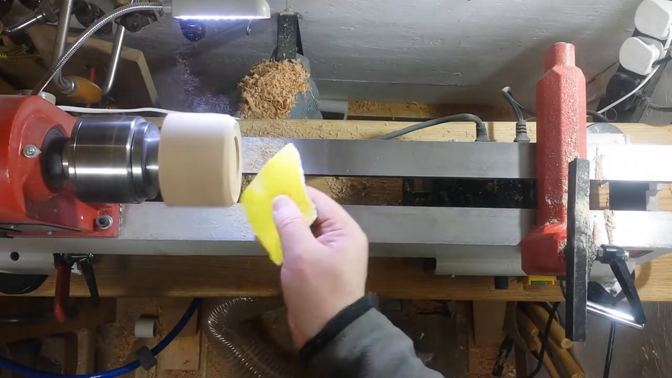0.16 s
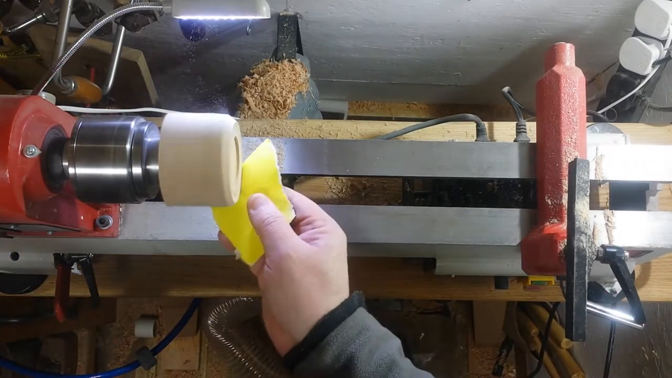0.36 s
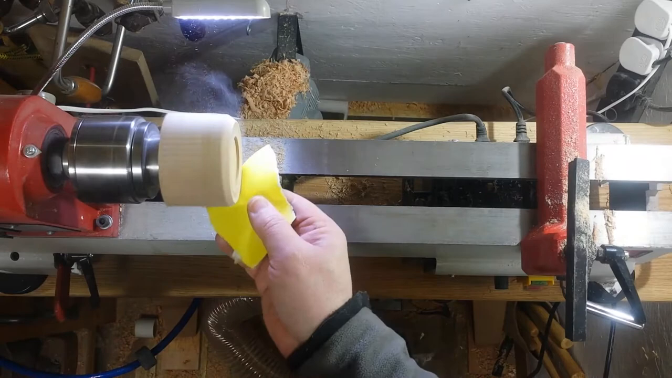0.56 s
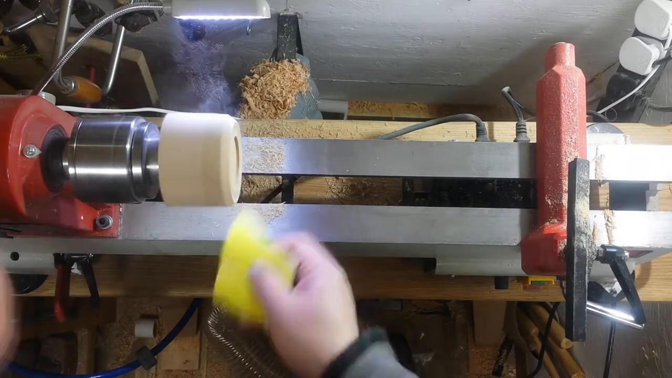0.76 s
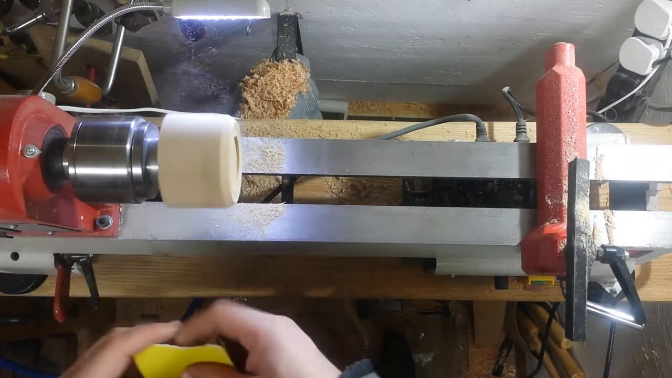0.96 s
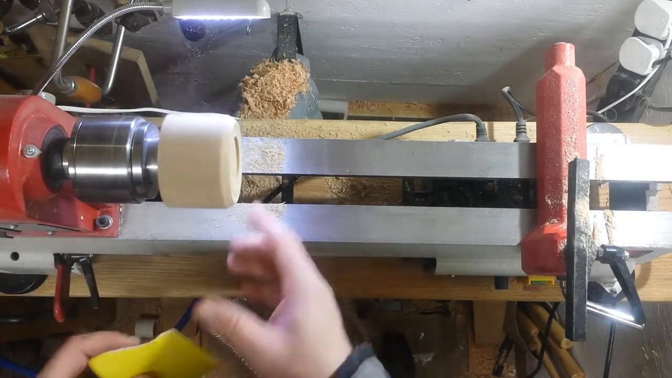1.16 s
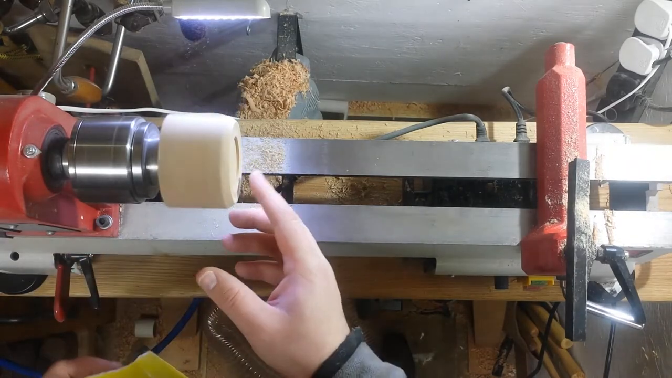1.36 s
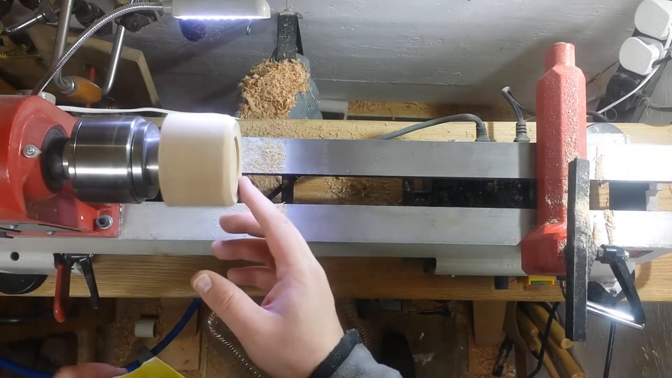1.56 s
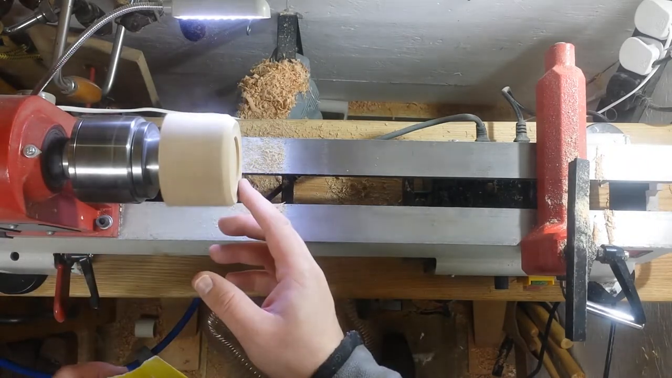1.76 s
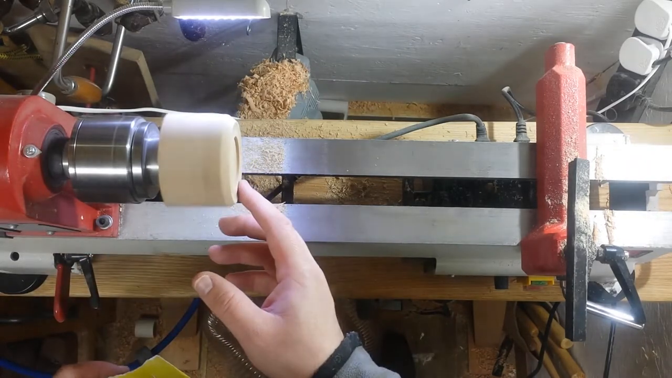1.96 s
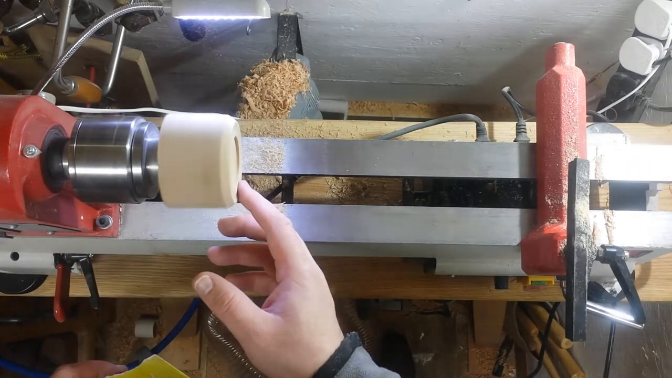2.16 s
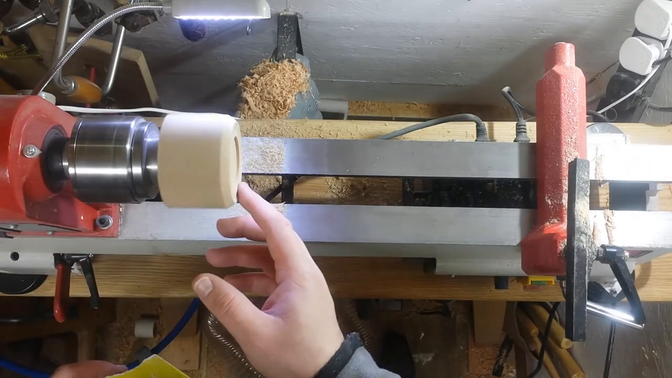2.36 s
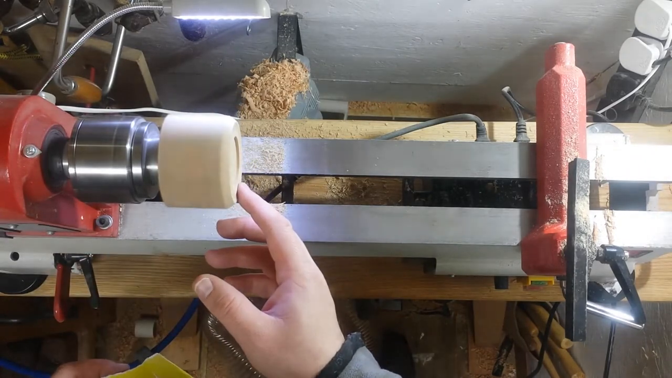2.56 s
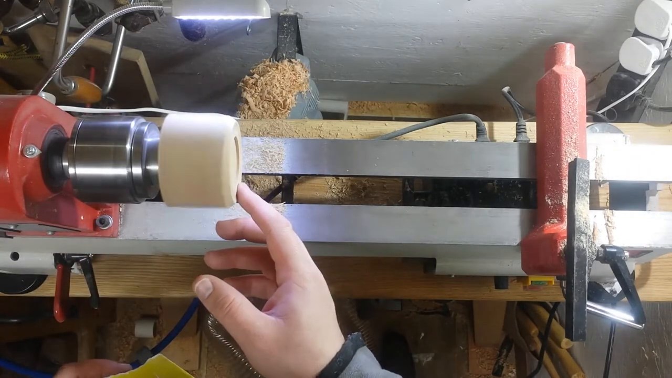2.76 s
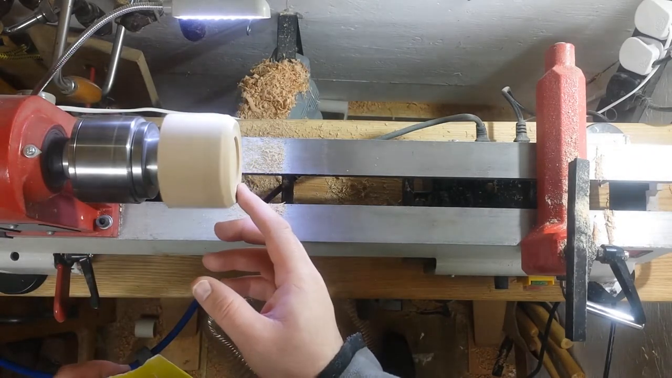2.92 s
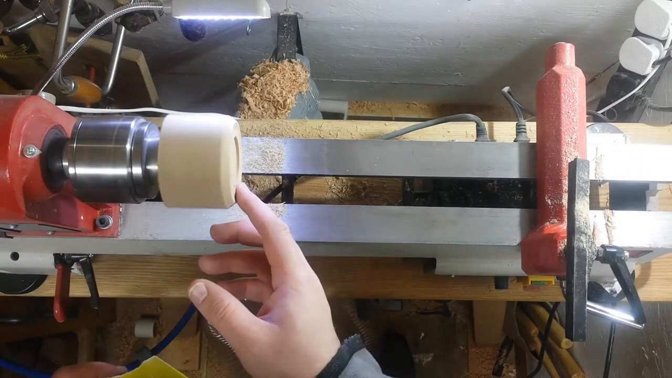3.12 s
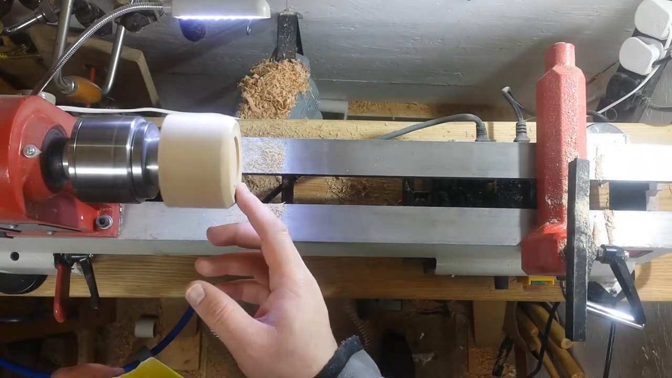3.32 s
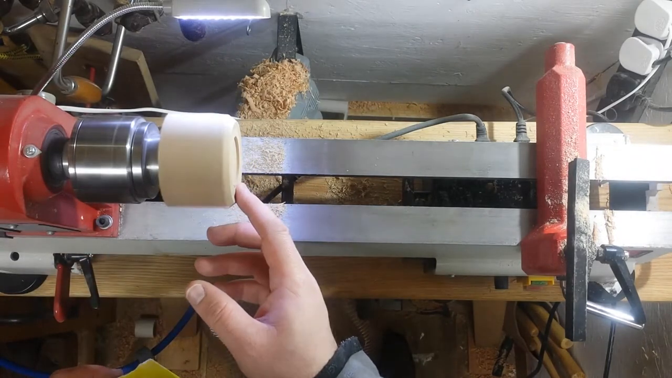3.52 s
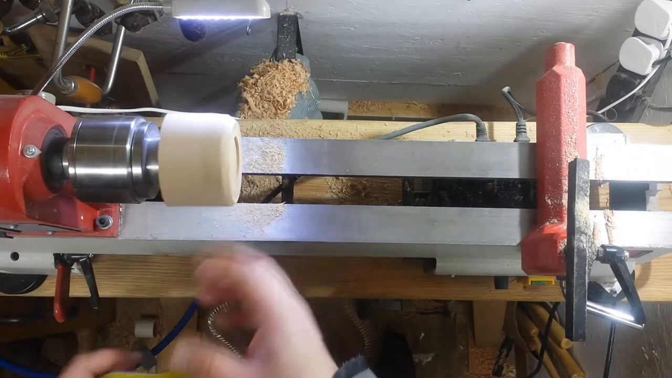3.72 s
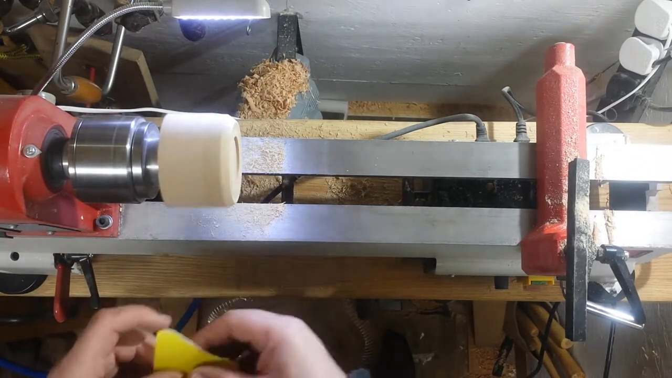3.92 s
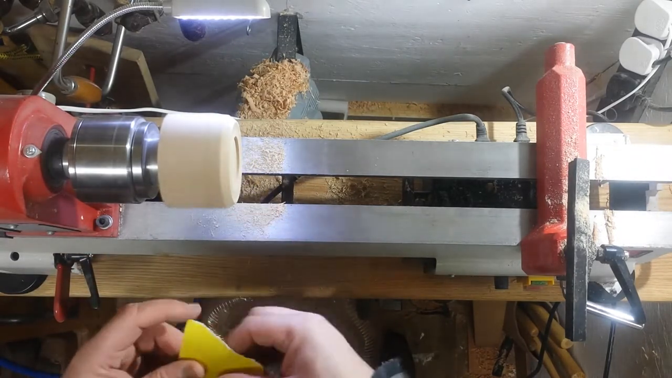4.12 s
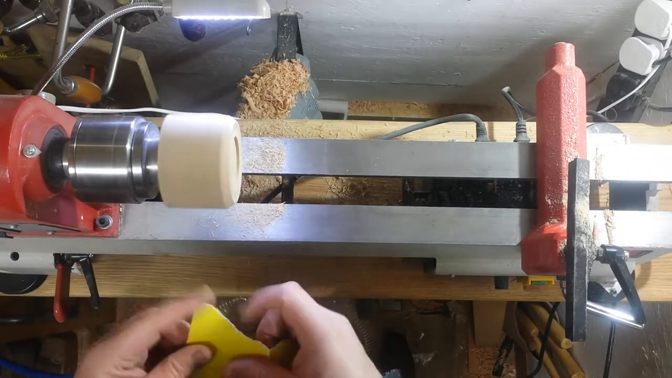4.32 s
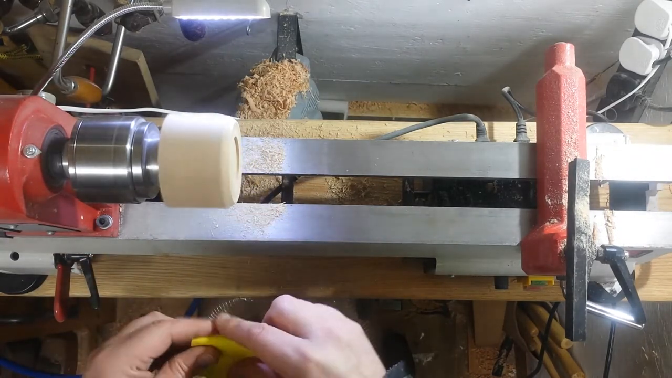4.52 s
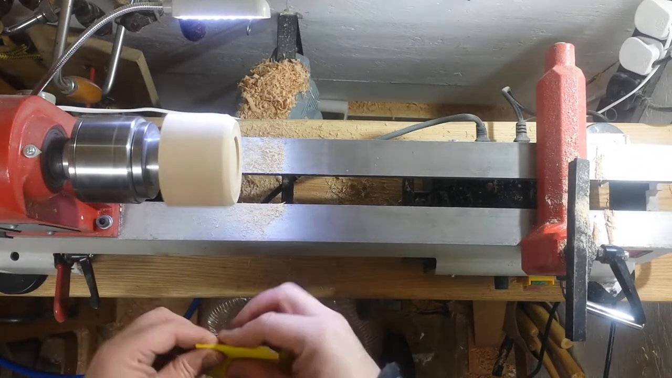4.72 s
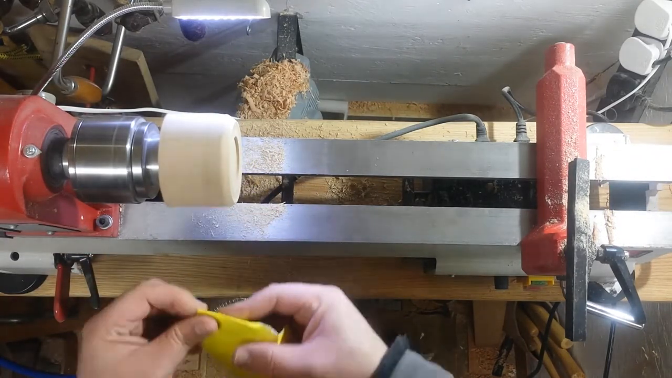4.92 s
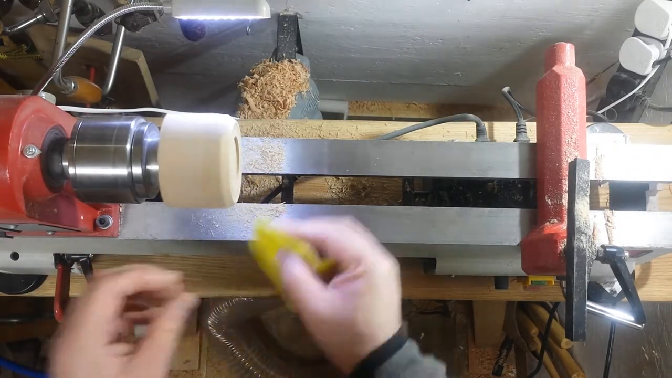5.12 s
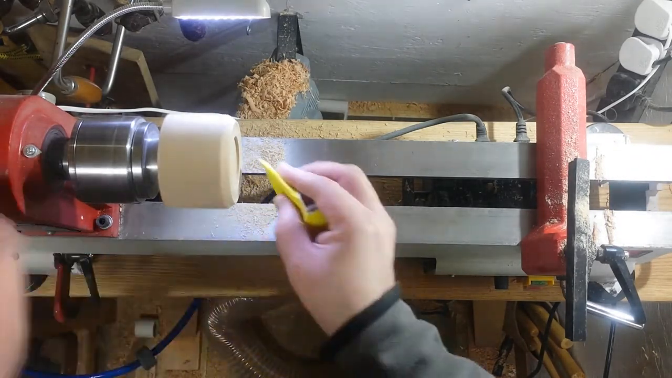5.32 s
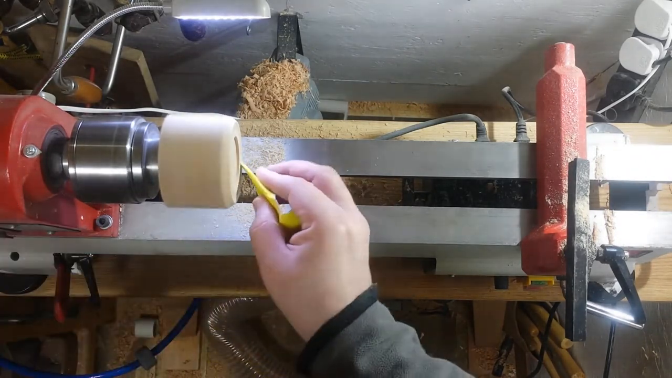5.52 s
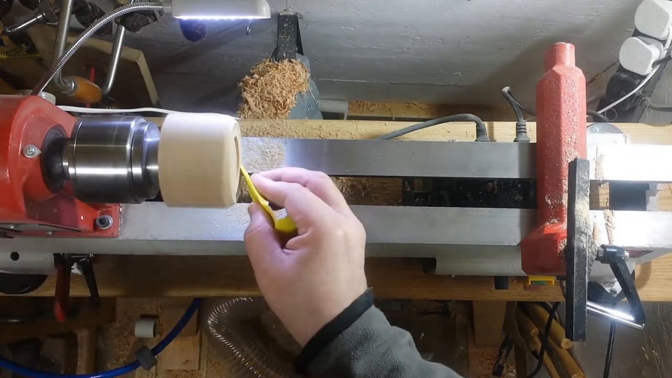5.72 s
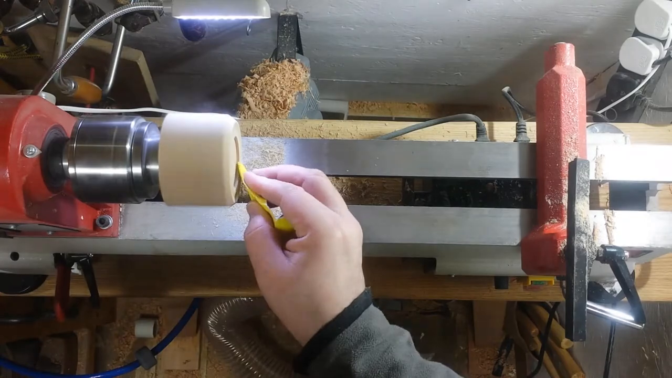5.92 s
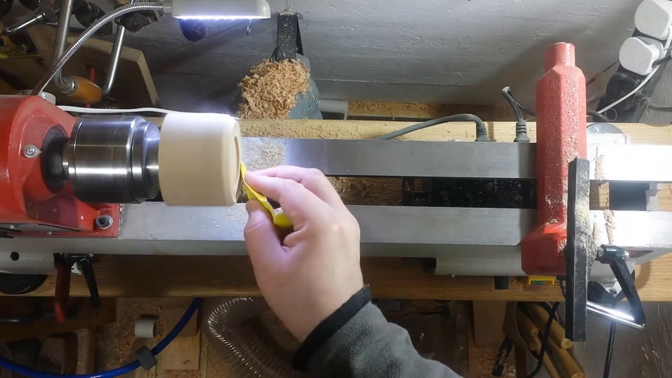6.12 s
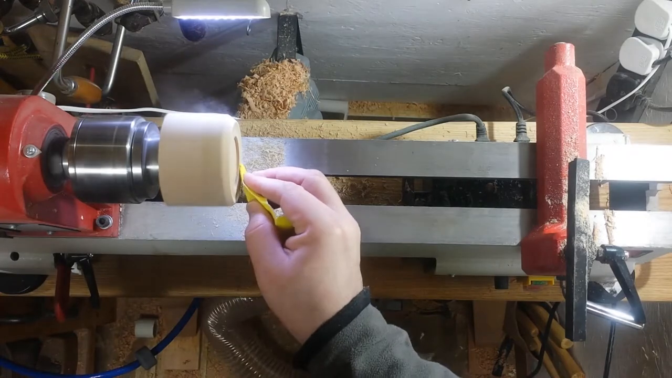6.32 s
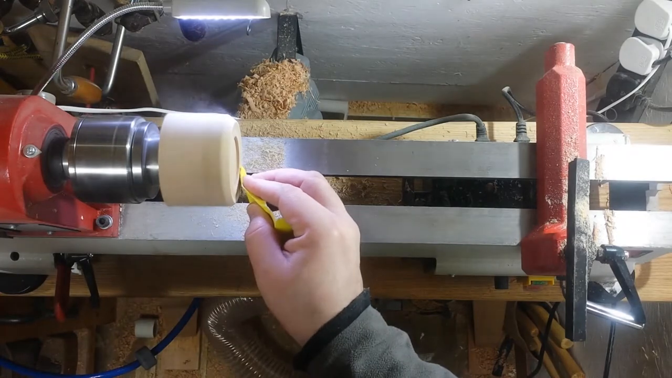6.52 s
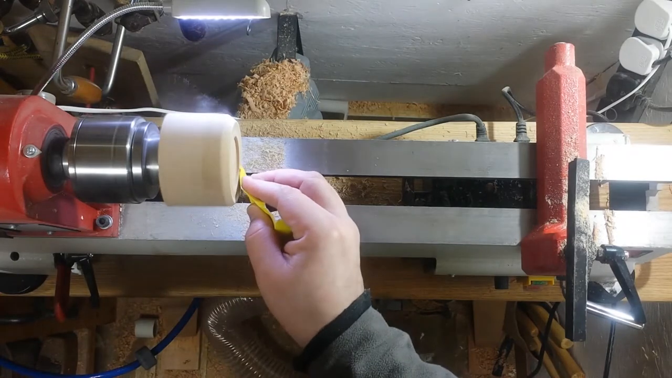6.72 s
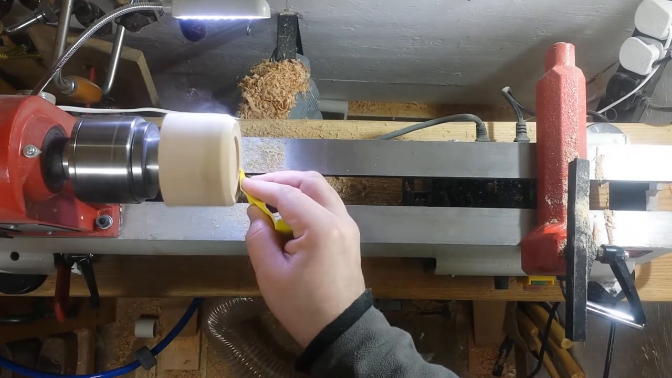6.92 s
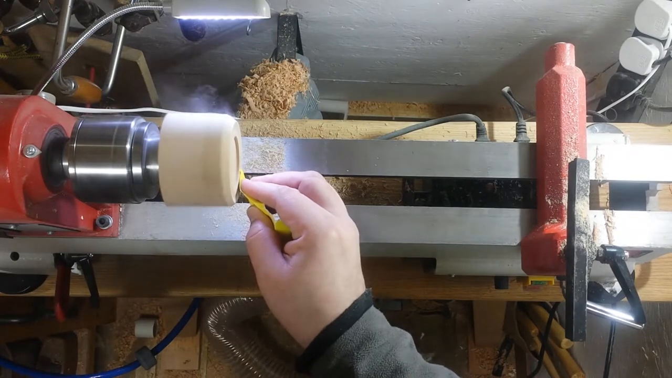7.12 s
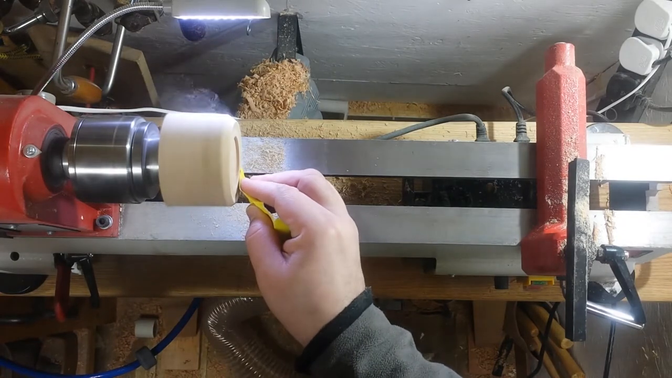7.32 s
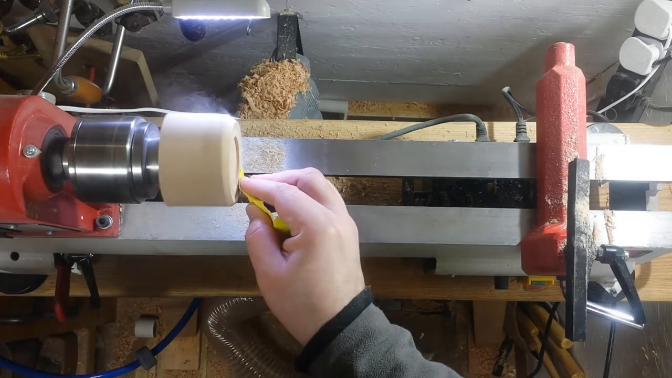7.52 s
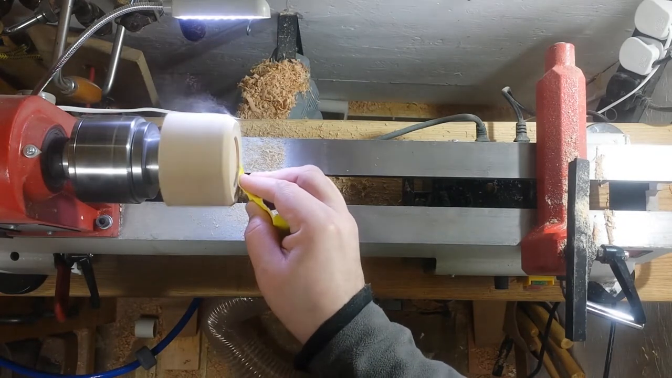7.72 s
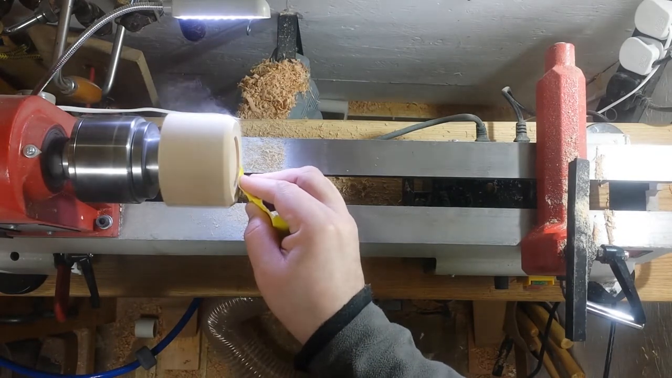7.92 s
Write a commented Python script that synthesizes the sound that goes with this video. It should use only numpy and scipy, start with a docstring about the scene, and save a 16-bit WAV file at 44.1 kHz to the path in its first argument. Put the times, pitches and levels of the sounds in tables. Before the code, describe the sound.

A small wood lathe hums and whines steadily while sandpaper strokes the spinning wood, pauses for paper crackles, then rasps hard in quick throbbing pulses.

```python
"""In a cramped workshop a small wood lathe spins a blank: shaken castings rattle, bearings sing, and
the speed controller whines, louder under load. Sandpaper is just leaving the wood; it grazes, strokes
once, is handled with crackles and a tap, then pressed on to the end; in between a fingertip hisses.
The rasp, torn fibres as random grains, throbs twice a turn with the end grain, and the spindle slows.
A gain control ducks the machine under the rasp and lets it swell back after a pause."""
import sys
import numpy as np
from scipy import signal
from scipy.fft import rfft, irfft, next_fast_len
from scipy.io import wavfile
from scipy.ndimage import uniform_filter1d, minimum_filter1d, map_coordinates

SR = 44100
rng = np.random.default_rng(int(sys.argv[2]) if len(sys.argv) > 2 else 0)


def bounce(signal):
    """Save signal as a 16-bit WAV file at the path given by the first command-line argument."""
    frames = np.transpose(np.atleast_2d(signal))
    limited = np.clip(frames, -1, 1)
    pcm = np.round(limited * 32767).astype(np.int16)
    wavfile.write(sys.argv[1], SR, pcm)


N = 351477

# Resonances of headstock and bed. Columns: f/Hz, width/Hz, level/dB
CASTING_MODES = [(392.6, 7.9, -0.5), (473.4, 40, -2.5), (548, 8.7, -0.5), (584, 10.4, -1.5), (684, 17.6, 6),
                 (711.7, 10.4, 2), (773, 9.1, 2), (836, 7.7, -6), (901, 26, -9), (950, 10, -12.5),
                 (1046, 13.5, -6), (1099.7, 18, 1.5), (1338, 63, -12), (1396, 11, -5), (1496, 19, -1.5),
                 (1552, 18, -3), (1617, 27, -11), (1770, 3, 1.5), (1907, 17, -6), (1920, 18, -8),
                 (2061, 31, -4.5), (2142, 12, -2), (2174, 14, -2), (2430, 14, -33), (2381, 9.7, 3.5),
                 (2923, 21, -3.5)]
# Low resonances of spindle, chuck and blank. Columns: f/Hz, width/Hz, free level/dB, level under paper/dB
SPINDLE_MODES = [(159.3, 38, -2.5, -8), (204, 21.2, 1, -5.5), (280.8, 13, -1.5, 8.5), (356, 93, -27, -8)]
# Bearing tones. Columns: f/Hz, level/dB re the drive
BEARING_TONES = [(466.5, -10.5), (684.5, -9.5), (1104, -12.5)]
# Spectrum of the whir of air. Columns: f/Hz, level/dB per Hz
WHIR_SPECTRUM = [(30, -37), (70, -6.5), (130, -1.5), (300, -2.5), (800, 2), (1250, -2.5), (1700, 2.5),
                 (2500, -4), (3100, -2.5), (3600, -24), (4900, -0.5), (6800, -6.5), (9500, -37),
                 (15500, -42)]
# Spectrum of the bare grit. Columns: f/Hz, level/dB per Hz
RASP_SPECTRUM = [(100, -32), (500, -23), (1000, -29.5), (1900, -25.5), (2600, -18.5), (3100, -14.5),
                 (4200, -4), (5500, 0), (7500, 2), (9600, -0.5), (11200, -6), (13500, -8), (15500, -16)]
# Spectrum of the loose paper edge. Columns: f/Hz, level/dB per Hz
FLAP_SPECTRUM = [(150, -34), (600, -16), (1100, -13), (1500, -9.5), (2000, -4.5), (2700, 2), (3100, 6.5),
                 (3600, 5.5), (4300, 10), (5500, 7.5), (8000, -38)]
# Spectrum of skin on wood. Columns: f/Hz, level/dB per Hz
SKIN_SPECTRUM = [(2500, -36), (3600, -11), (4200, 1.5), (5500, -2), (6500, 3), (7900, -0.5), (9500, -4),
                 (12000, -5.5), (15500, -17)]
# Spectrum of creasing paper. Columns: f/Hz, level/dB per Hz
CREASE_SPECTRUM = [(700, -12), (1400, 1), (2400, -0.5), (3100, 2), (4000, 1), (6300, 6), (8500, -1),
                   (12000, -8), (15500, -32)]
# Spectrum of paper knocking on wood. Columns: f/Hz, level/dB per Hz
KNOCK_SPECTRUM = [(150, -45), (900, -16), (1300, 1.5), (1700, 1.5), (2100, 5), (2800, -3.5), (5000, -20.5)]
# Spectrum of the dull bumps. Columns: f/Hz, level/dB per Hz
BUMP_SPECTRUM = [(30, -25), (70, -4), (100, 0), (140, -4), (300, -33), (1500, -72)]
# Paper on the wood. Columns: start t/s, end t/s, force level/dB re full pressure, boom rise/dB at full load,
# seating t/s
STROKES_OF_PAPER = [(-.1, .005, -3, 14, 0.023), (0.02, .05, -17, 11.5, 0.0037),
                    (0.356, 0.687, -8, 22, 0.034), (5.526, 7.998, -10.5, 12, .024)]
# Added force as the hand leans in. Columns: t/s, level/dB
LEAN_CURVE = [(5.75, 2.5), (5.86, 1), (5.93, 12.5), (6.17, 13.5), (6.24, 13), (6.31, 12.5), (6.7, 12.5),
              (6.75, 10), (6.8, 13), (7.15, 11), (7.45, 9.5), (7.97, 10.5)]
# How the paper is held. Columns: t/s, lower sheet mode f/Hz, upper sheet mode f/Hz, their width/Hz,
# upper mode level/dB re lower; then, re the bare grit: sheet ring level/dB, loose edge level/dB,
# ring of the blank level/dB
GRIP_CURVE = [(.05, 5900, 8000, 3000, -8, -0.5, -7, 2), (.36, 6400, 9200, 3000, -6, 2.5, -11, -19.5),
              (.7, 6230, 8900, 3000, -6.5, 3, -11.5, -6), (5.53, 4710, 6600, 1990, -5.5, 9, -12.5, -27),
              (5.79, 4760, 6800, 2100, -5.5, 6, -9.5, -23), (5.9, 5670, 6530, 1420, -5, 4, -6.5, 0.5),
              (6.02, 6060, 7150, 1700, -1, 5.5, -9.5, -2.5), (6.3, 6090, 7450, 1650, -6, 8, -14.5, -1.5),
              (6.72, 6390, 7600, 1780, -1, 2.5, -18, -1), (6.8, 6200, 8400, 2600, -5.5, 4.5, -13.5, -10),
              (7.03, 6060, 8200, 2600, -6, 0.5, -13, -4), (7.12, 6240, 7300, 2400, -18, -1.5, -16, 1),
              (7.65, 6300, 7050, 2240, -5.5, 4.5, -9.5, -1), (7.97, 6790, 7800, 2580, 0, -2, -9.5, -3)]
# Grit snagging on the end grain. Columns: t/s, added friction level/dB
GRIT_SNAGS = [(.399, 2.5), (.586, 2), (5.529, 4), (5.57, 4), (5.613, 2), (6.154, 4), (6.292, 3.5),
              (6.351, 4.5), (6.515, 2.5), (6.581, 5.5), (6.713, 3.5), (7.447, 3.5), (7.548, 4.5),
              (7.596, 3), (7.656, 3.5)]
# Low knocks of the paper on the wood during the strokes. Columns: t/s, level/dB
PAPER_KNOCKS = [(.364, -35.5), (.43, -34), (.55, -33), (.68, -38), (5.553, -25), (5.61, -33),
                (5.676, -24.5), (5.74, -30), (5.849, -33.5)]
# Brief stick-slip squeals of the paper. Columns: t/s, f/Hz, level/dB
PAPER_SQUEALS = [(5.773, 5000, -11), (5.809, 4950, -9), (5.901, 5880, -0.5)]
# Treble modes of the wooden blank. Columns: f/Hz, width/Hz, level/dB
BLANK_MODES = [(5800, 90, -16), (6420, 270, -10), (7114, 82, -4.5)]
# Bands lifted or cancelled by the hollow between hand and blank. Columns: f/Hz, width/Hz, level/dB
HOLLOW_BANDS = [(3000, 250, -8.5), (3570, 230, 1.5), (4410, 170, 3.5), (4500, 430, -8), (7100, 82, -3),
                (8220, 150, -6), (8260, 410, 1.5), (10050, 400, -3), (11100, 580, -1)]
# Handling the paper. Columns: t/s, level/dB, rise t/s, decay t/s
PAPER_RUSTLES = [(.953, -34, 0.0027, 0.0049), (0.968, -30.5, 0.0007, 0.0058), (1.015, -26, 0.0043, 0.0019),
                 (1.098, -34, 0.0068, 0.024), (1.146, -31, 0.0019, 0.0017), (3.92, -42, 0.019, 0.034),
                 (4.06, -44, .012, 0.017), (4.17, -44.5, 0.029, 0.041), (4.3, -42.5, 0.039, 0.1),
                 (4.673, -20.5, 0.00089, 0.0013), (4.684, -41, 0.0059, 0.011), (4.8, -43.5, .02, 0.036),
                 (4.861, -31, 0.006, 0.0045), (4.871, -33, 0.0044, 0.0039), (5.068, -39, 0.0064, 0.018),
                 (5.097, -39.5, .015, 0.0084)]
# Modes of the hard tap on the bench. Columns: f/Hz, level/dB
BENCH_TAP_MODES = [(1250, -2), (2850, -5), (3110, 2)]
# Fingertip on the blank. Columns: t/s, level/dB
FINGER_CURVE = [(1.56, -54), (1.66, -47), (2.55, -45), (2.9, -46), (3.1, -50), (3.58, -49), (3.68, -54.5)]
# Dull bumps while the hands are at the bench. Columns: t/s, level/dB, rise t/s, decay t/s
BENCH_BUMPS = [(3.91, -69, 0.019, .04), (4.26, -48.5, 0.028, 0.029)]

# Machine
MOTOR_HZ, CONTROLLER_HZ = 40.5, 13352
FREE_TURNS_PER_S, START_TURN = 15.83, -.24
DRAG_TURNS_PER_S, SAG_TURNS_PER_S2 = .165, .452  # slowing at once, then steadily while the paper is on
DRIVE_DB, DRONE_DB = -40, -43  # source gains; the drone's is for running free
WHINE_DB, WHINE_LOAD_DB, WHINE_WAVER_DB = -40.5, 8.5, 0.55
LOAD_LAG_S = 0.066  # the machine answers pressure a little late
FULL_LOAD = 0.72  # share of full pressure at which boom and whine stop growing

# Paper
RASP_DB = -9  # source gain at full pressure
SEAT_DB, LIFT_DB_PER_S = 7.5, 844  # the paper lands lightly, seats itself, and is lifted off fast
SNAG_RISE_S, SNAG_DECAY_S = 0.0009, 0.006
LIGHT_JUDDER_DB, FIRM_JUDDER_DB, JUDDER_PER_S = 2.4, 0.9, 520
CHATTER_DB, CHATTER_LOSS_PER_DB = -20.5, 2.45  # leaning in stills the chatter
KNOCK_RISE_S, KNOCK_DECAY_S = 0.015, 0.0094
SQUEAL_RISE_S, SQUEAL_DECAY_S = .0009, .003
TAP_S, TAP_DB, TAP_T60_S = 1.113, -35, 0.032  # tap as the paper changes hands

# Fingertip
FINGER_RING_DB, SQUEAK_DB = -1.5, -7.5  # relative to the hiss of the skin, at the firmest touch
FINGER_RING_HZ, FINGER_RING_WIDTH_HZ = 7280, 260
SQUEAK_HZ, SQUEAK_SWING_HZ, SQUEAK_WIDTH_HZ = 8800, 550, 160

# Surroundings and gain control
REFLECTION_S, REFLECTION_SPREAD_S, HAND_SWAY_S = .0017, .0009, .00007
SHOP_T60_S, CUTOFF_HZ = 0.075, 15600
CEILING_DB, DETECT_S, HOLD_S, RECOVER_DB_PER_S = -13.5, 0.0528, 0.73, 8.5


def from_db(db):
    """Amplitude ratio of a level in decibels."""
    return 10 ** (np.asarray(db) / 20)


def rms_one(x):
    """Normalisation to unit mean power."""
    return x / np.sqrt(np.mean(x ** 2) + 1e-20)


def times():
    """The time of every sample, in seconds."""
    return np.arange(N) / SR


def in_time(rows):
    """Linear interpolation of a table's columns over time."""
    s, *columns = np.transpose(rows)
    return [np.interp(times(), s, c) for c in columns]


def drift(rate):
    """Band-limited random fluctuation of unit rms, from `rate` random points a second."""
    points = rng.standard_normal(8000)
    return rms_one(np.interp(times() * rate + 2, np.arange(len(points)), points))


def coloured(x, spectrum):
    """Spectral shaping by multiplication in the frequency domain; unit rms."""
    hz, db = np.transpose(spectrum)
    size = next_fast_len(N)
    bins = np.maximum(np.fft.rfftfreq(size, 1 / SR), 1)
    gain = from_db(np.interp(np.log(bins), np.log(hz), db))
    return rms_one(irfft(rfft(x, size) * gain, size)[..., :N])


def resonance(hz, width_hz):
    """Damped resonance as a two-pole band-pass with unit gain at its peak."""
    r = np.exp(-np.pi * width_hz / SR)
    return (1 - r * r) / 2 * np.array([1, 0, -1]), [1, -2 * r * np.cos(2 * np.pi * hz / SR), r * r]


def modes(x, rows, flip=1):
    """Modal superposition at unit rms; flip=-1 alternates the polarity of successive modes."""
    return rms_one(sum(flip ** k * from_db(db) * signal.lfilter(*resonance(hz, width), x)
                       for k, (hz, width, db) in enumerate(rows)))


def gliding_resonance(x, hz, width_hz, size=256):
    """Time-varying resonance: centre and width step block by block while the state carries over."""
    out, state, widths = np.zeros(N), np.zeros(2), np.broadcast_to(width_hz, N)
    for i in range(0, N, size):
        block = slice(i, i + size)
        out[block], state = signal.lfilter(*resonance(hz[i], widths[i]), x[block], zi=state)
    return out


def grains(per_s, spread_db):
    """Fracture as a random impulse process: many small grains, a few much larger."""
    sizes = from_db(spread_db * np.minimum(rng.exponential(1, N), 5))
    signs = rng.choice([-1, 1], N)
    return rms_one(sizes * signs * (rng.random(N) < per_s / SR))


def swells(rows):
    """Summed envelopes of short events with exponential rise and decay."""
    t, out = times(), np.zeros(N)
    for s, db, rise, decay in rows:
        near = slice(*np.searchsorted(t, [s - 20 * rise, s + 20 * decay]))
        out[near] += from_db(db) * np.exp(-np.maximum((s - t[near]) / rise, (t[near] - s) / decay))
    return out


def lagged(x, lag_s):
    """First-order inertia: the output relaxes exponentially towards the input."""
    r = np.exp(-1 / (lag_s * SR))
    return signal.lfilter([1 - r], [1, -r], x, zi=[r * x[0]])[0]


def at_ports(x, delay, pan_db):
    """Time and level differences at two ports: left is `delay` samples late, `pan_db` above right."""
    left = np.pad(x, (delay, 0))[:N] * from_db(pan_db / 2)
    right = x * from_db(-pan_db / 2)
    return np.array([left, right])


def per_stroke():
    """Piecewise-constant control: the columns of the latest stroke, at every sample."""
    rows = np.array(STROKES_OF_PAPER)
    latest = np.searchsorted(rows[:, 0], times(), side="right") - 1
    return rows[np.maximum(latest, 0)].T


def hand_pressure(start, end, force_db, seat_s):
    """Contact force through landing, seating, hold and lift; 1 is full pressure."""
    t = times()
    seating_db = SEAT_DB * np.clip(1 - ((t - start) / seat_s) ** 2, 0, 1)
    lift_db = np.clip(LIFT_DB_PER_S * (t - end), 0, 100)
    return from_db(force_db - seating_db - lift_db)


def spindle_turns(start, end):
    """Rotation as integrated speed: contact slows it at once, and further the longer it lasts."""
    t = times()
    slowing = (t < end) * (DRAG_TURNS_PER_S + SAG_TURNS_PER_S2 * (t - start))
    return START_TURN + np.cumsum(FREE_TURNS_PER_S - slowing) / SR


def rattle(turns, loose, size=4096):
    """Rotation-locked excitation: belt and bearing unevenness recurs each turn, plus free chatter."""
    track = rms_one(irfft(np.exp(2j * np.pi * rng.random(size // 2 + 1))))
    position = (turns + .002 * drift(5)) * size
    locked = rms_one(np.interp(position, np.arange(size), track, period=size))
    return rms_one(locked + loose * rng.standard_normal(N))


def drive(turns, drive_db):
    """Forced vibration: belt and bearings excite casting modes; bearing tones, motor hum and air add."""
    body = modes(rattle(turns, loose=0.52), CASTING_MODES)
    scattered = np.array([modes(rattle(turns, loose=0.66), CASTING_MODES) for side in range(2)])
    tones = np.zeros(N)
    for hz, db in BEARING_TONES:
        level = from_db(db + 1.6 * drift(14))
        phase = 2 * np.pi * np.cumsum(hz + 3.784 * drift(20)) / SR
        tones += level * np.sqrt(2) * np.sin(phase)
    motor = from_db(-25.0 + 2.2 * drift(7.3)) * np.sqrt(2) * np.sin(2 * np.pi * MOTOR_HZ * times())
    near_air = at_ports(coloured(rng.standard_normal(N), WHIR_SPECTRUM), delay=5, pan_db=-7.0)
    wide_air = coloured(rng.standard_normal((2, N)), WHIR_SPECTRUM)
    air = near_air + from_db(3.5) * wide_air
    direct = at_ports(from_db(0.5) * body + tones + motor, delay=5, pan_db=-0.3)
    return from_db(drive_db) * (direct + from_db(-4.5) * scattered + from_db(-7) * air)


def drone(turns, drone_db):
    """Low modal boom of spindle, chuck and blank; drag shifts the weight to the upper two modes."""
    speed = np.gradient(turns) * SR
    drag = np.clip((FREE_TURNS_PER_S - speed) / 0.71, 0, 1)
    drag = uniform_filter1d(drag, size=8000)
    shake = rattle(turns, loose=0.94)
    boom = np.zeros(N)
    for k, (hz, width, free_db, held_db) in enumerate(SPINDLE_MODES):
        level = from_db(free_db + drag * (held_db - free_db))
        boom += (-1) ** k * level * signal.lfilter(*resonance(hz, width), shake)
    band = signal.butter(2, [120, 400], "band", fs=SR, output="sos")
    boom = signal.sosfilt(band, rms_one(boom))
    return from_db(drone_db - 1.5) * at_ports(boom, delay=4, pan_db=1.5)


def whine(load):
    """Switching tone of the controller, louder under load, with a noisy skirt from the turning motor."""
    whine_db = WHINE_DB + WHINE_LOAD_DB * load + WHINE_WAVER_DB * drift(3.65)
    skirt = rms_one(signal.lfilter(*resonance(CONTROLLER_HZ, 110), rng.standard_normal((2, N))))
    port_phase, port_db = np.array([[1.2], [0]]), np.array([[-8], [4]])
    tone = np.sqrt(2) * np.sin(2 * np.pi * CONTROLLER_HZ * times() + port_phase)
    return from_db(whine_db + port_db) * (tone + from_db(-16.0) * skirt)


def end_grain(turns, depth_db):
    """Anisotropic friction: the swell comes twice a turn, very slightly uneven between sides."""
    swell = np.cos(4 * np.pi * turns) * (1 + 0.12 * drift(20.89)) + 0.007 * np.cos(2 * np.pi * turns)
    return rms_one(from_db(depth_db * swell))


def sheet_mode(hz, width_hz):
    """Resonance of the pinched sheet: grains pass three equal gliding filters."""
    ringing = grains(per_s=9000, spread_db=4.0)
    for stage in range(3):
        ringing = gliding_resonance(ringing, hz, width_hz)
    return rms_one(ringing / np.sqrt(width_hz))


def hollow(x):
    """Interference in the space between hand and blank, as spectral peaks and notches."""
    for hz, width, db in HOLLOW_BANDS:
        x = x + (from_db(db) - 1) * signal.lfilter(*resonance(hz, width), x)
    return x


def squeals():
    """Stick-slip oscillation: for a few milliseconds the paper locks onto one wavering pitch."""
    waver = 1 + .012 * drift(400)
    out = np.zeros(N)
    for s, hz, db in PAPER_SQUEALS:
        envelope = swells([(s, db, SQUEAL_RISE_S, SQUEAL_DECAY_S)])
        out += envelope * np.sin(2 * np.pi * hz * np.cumsum(waver) / SR)
    return out


def sanding(turns, pressure, lean_db):
    """Abrasion as grain noise that excites sheet, loose edge and blank; returns paper and wood."""
    lower_hz, upper_hz, width_hz, upper_db, ring_db, flutter_db, blank_db = in_time(GRIP_CURVE)
    snags = 1 + sum((from_db(db) - 1) * swells([(s, 0, SNAG_RISE_S, SNAG_DECAY_S)])
                    for s, db in GRIT_SNAGS)
    # a lightly held paper judders more
    judder_db = np.interp(lean_db, [lean_db.min(), lean_db.max()], [LIGHT_JUDDER_DB, FIRM_JUDDER_DB])
    bite = end_grain(turns, depth_db=3.4) * from_db(judder_db * drift(JUDDER_PER_S)) * snags

    grit = coloured(grains(per_s=19000, spread_db=2.0), RASP_SPECTRUM)
    sheet = sheet_mode(lower_hz, width_hz) + from_db(upper_db) * sheet_mode(upper_hz, width_hz)
    sheet = from_db(ring_db) * sheet / np.sqrt(1 + from_db(upper_db) ** 2)
    rasp = bite * (grit + sheet) / np.sqrt(1 + from_db(ring_db) ** 2)

    edge = coloured(grains(per_s=2600, spread_db=3.0), FLAP_SPECTRUM)
    flutter = from_db(flutter_db + 2.2 * drift(40)) * end_grain(turns, depth_db=1.5) * edge

    force = from_db(RASP_DB) * pressure
    chatter = force * from_db(CHATTER_DB - CHATTER_LOSS_PER_DB * lean_db)
    single_knocks = swells((s, db, KNOCK_RISE_S, KNOCK_DECAY_S) for s, db in PAPER_KNOCKS)
    knocks = (chatter + single_knocks) * coloured(grains(per_s=2300, spread_db=3.0), KNOCK_SPECTRUM)

    paper = force * hollow(rasp + flutter) + knocks + squeals()
    blank_ring = modes(grains(per_s=15600, spread_db=3.0), BLANK_MODES, flip=-1)
    return paper, force * bite * from_db(blank_db) * blank_ring


def off_the_hand(x, count=40):
    """Dispersive scattering off hand, chuck and bed: delay varies with frequency and sways in time."""
    size = next_fast_len(N + SR // 10)
    hz, t = np.fft.rfftfreq(size, 1 / SR), times()
    sides = []
    for delays in np.abs(REFLECTION_S + REFLECTION_SPREAD_S * rng.standard_normal((2, count))):
        # phase is the integral of group delay over frequency
        group_delay = np.interp(hz, np.linspace(0, SR / 2, count), delays)
        phase = 2 * np.pi * hz[1] * np.cumsum(group_delay)
        scattered = irfft(rfft(x, size) * np.exp(-1j * phase), size)[:N]
        swayed = (t - HAND_SWAY_S * drift(3)) * SR
        sides.append(map_coordinates(scattered, [swayed], order=3))
    return np.array(sides)


def workshop(x, cut_hz):
    """Exponential reverberant decay off bench, wall and shelves, independent at each port."""
    t = np.arange(SR // 3) / SR
    echo = rng.standard_normal((2, len(t))) * from_db(-60 * t / SHOP_T60_S) * (t > .002)
    echo /= np.sqrt(np.sum(echo ** 2, axis=1, keepdims=True))
    low_pass = signal.butter(1, min(cut_hz, SR * .45), fs=SR)
    return signal.lfilter(*low_pass, signal.fftconvolve(x[None], echo, axes=1)[:, :N])


def folding():
    """Buckling of a stiff sheet releases clumps of crackles; a tap rings as decaying modes."""
    since = np.maximum(times() - TAP_S, 0)
    decay_db = np.minimum(60 * since / TAP_T60_S, 200)
    tap = sum(from_db(TAP_DB + db - decay_db) * np.sin(2 * np.pi * hz * since)
              for hz, db in BENCH_TAP_MODES)
    crackle = coloured(grains(per_s=8000, spread_db=2.5), CREASE_SPECTRUM)
    return swells(PAPER_RUSTLES) * crackle + tap


def fingertip(turns):
    """Skin friction as noise, with chirps gliding down and up in each turn; returns skin and rim ring."""
    level_db, = in_time(FINGER_CURVE)
    level = from_db(level_db)
    firmness = from_db(level_db - level_db.max())
    hiss = end_grain(turns, depth_db=2.0) * coloured(rng.standard_normal(N), SKIN_SPECTRUM)
    rim = signal.lfilter(*resonance(FINGER_RING_HZ, FINGER_RING_WIDTH_HZ), rng.standard_normal(N))
    ring = from_db(FINGER_RING_DB) * rms_one(rim)
    chirp_hz = SQUEAK_HZ + SQUEAK_SWING_HZ * np.cos(2 * np.pi * turns)
    squeak = rms_one(gliding_resonance(rng.standard_normal(N), chirp_hz, SQUEAK_WIDTH_HZ))
    # negative depth: the chirps swell between the peaks of the hiss
    chirps = end_grain(turns, depth_db=-4) * squeak
    return level * (hiss + firmness * from_db(SQUEAK_DB) * chirps), level * firmness * ring


def bench_bumps():
    """Low-frequency impact noise: dull bumps at the bench as shaped noise under short envelopes."""
    return swells(BENCH_BUMPS) * coloured(rng.standard_normal(N), BUMP_SPECTRUM)


def gain_control(x):
    """Level regulation: power over the ceiling cuts the gain, which is held, then creeps back."""
    power = uniform_filter1d(np.mean(x ** 2, axis=0), size=int(DETECT_S * SR))
    gain_db = np.minimum(CEILING_DB - 10 * np.log10(np.maximum(power, 1e-12)), 0)
    half = int(HOLD_S * SR / 2)
    held_db = minimum_filter1d(gain_db, size=2 * half + 1, origin=half, mode="nearest")
    creep_db = RECOVER_DB_PER_S * times()
    return x * from_db(np.minimum.accumulate(held_db - creep_db) + creep_db)


def scene():
    """Superposition of the machine with the hands' direct, scattered and reverberant sound."""
    start, end, force_db, boom_db, seat_s = per_stroke()
    lean_db, = in_time(LEAN_CURVE)
    pressure = hand_pressure(start, end, force_db + lean_db, seat_s)
    load = lagged(np.minimum(pressure, FULL_LOAD), LOAD_LAG_S)
    turns = spindle_turns(start, end)
    machine = drive(turns, DRIVE_DB) + drone(turns, DRONE_DB + boom_db * load) + whine(load)
    paper, wood = sanding(turns, pressure, lean_db)
    skin, rim = fingertip(turns)
    hands = paper + skin + folding()
    near = from_db(-4) * at_ports(hands, delay=3, pan_db=-3.5) + from_db(3.0) * off_the_hand(hands)
    singing = from_db(4.0) * at_ports(wood, delay=3, pan_db=3.0) + at_ports(rim, delay=1, pan_db=6.0)
    room = from_db(1.0) * workshop(hands, cut_hz=22000)
    return near + singing + room + bench_bumps() + machine


def record(dry):
    """Gain control, soft saturation of the tallest peaks, and a steep low-pass."""
    ridden = gain_control(dry)
    rounded = ridden / (1 + (ridden / .9) ** 4) ** .25
    low_pass = signal.ellip(12, .1, 90, CUTOFF_HZ, fs=SR, output="sos")
    return signal.sosfilt(low_pass, rounded)


dry = scene()
out = record(dry)
bounce(out)
```